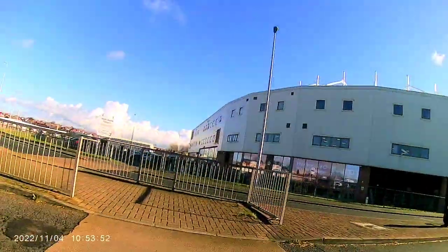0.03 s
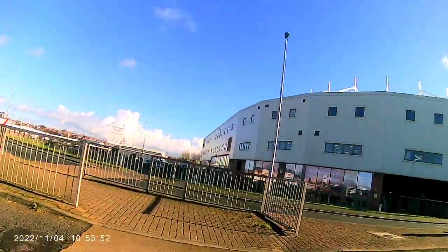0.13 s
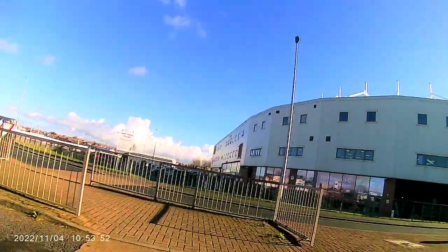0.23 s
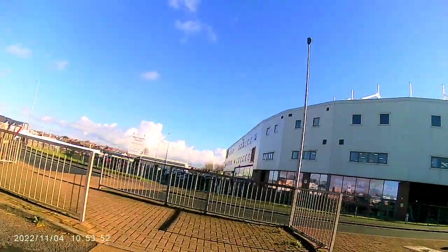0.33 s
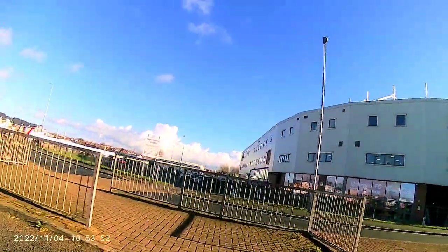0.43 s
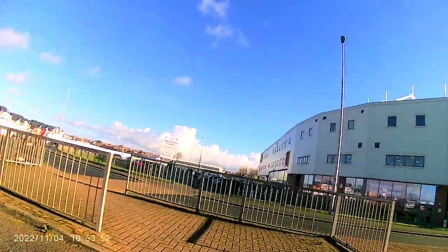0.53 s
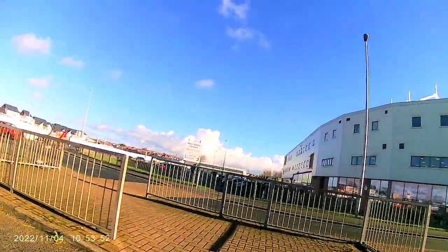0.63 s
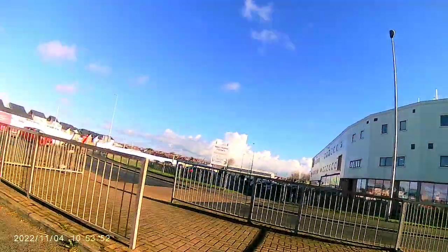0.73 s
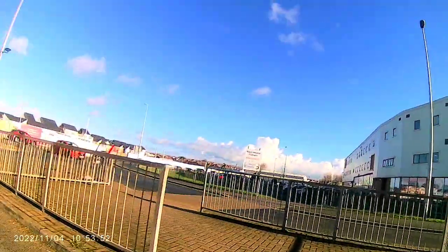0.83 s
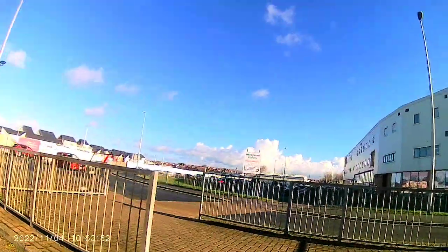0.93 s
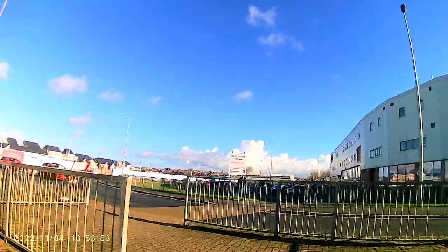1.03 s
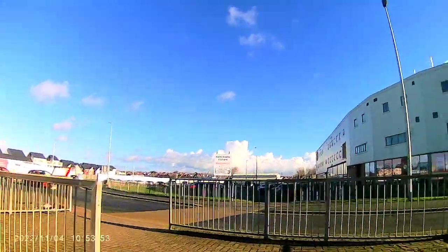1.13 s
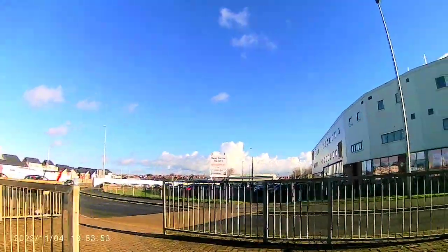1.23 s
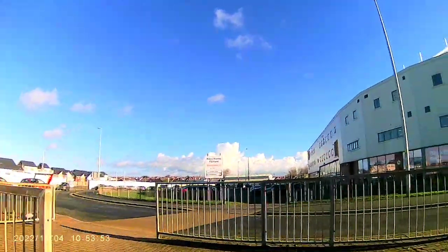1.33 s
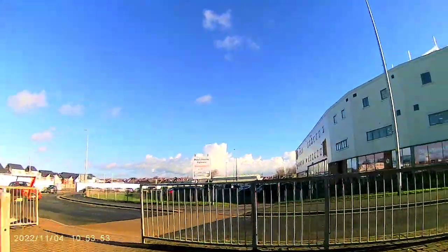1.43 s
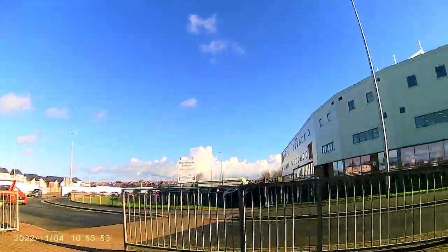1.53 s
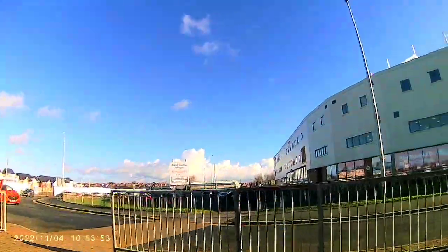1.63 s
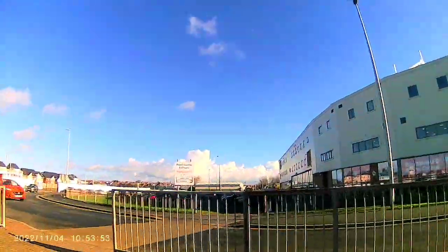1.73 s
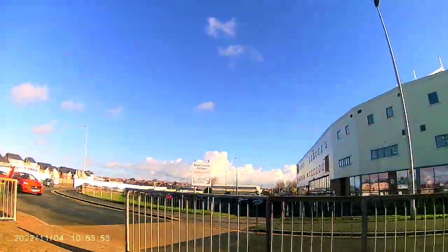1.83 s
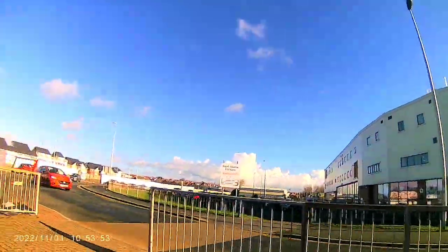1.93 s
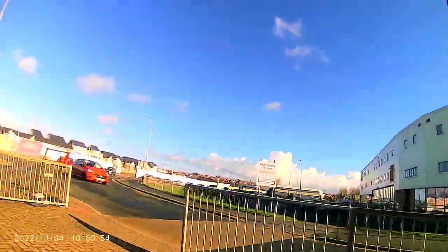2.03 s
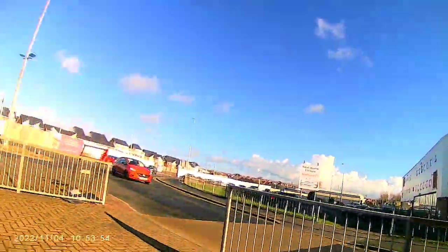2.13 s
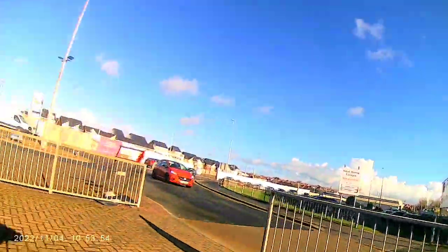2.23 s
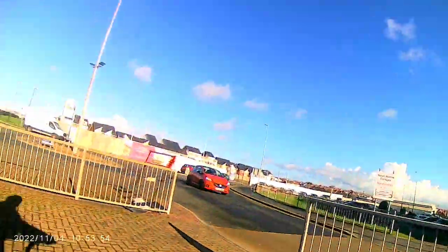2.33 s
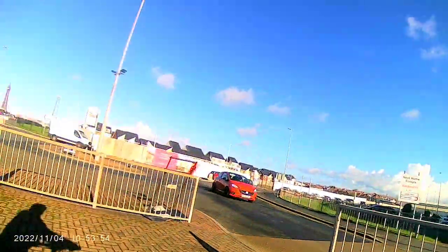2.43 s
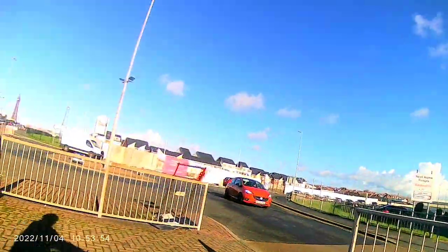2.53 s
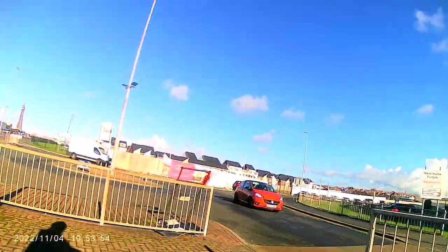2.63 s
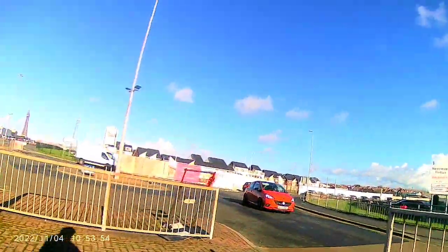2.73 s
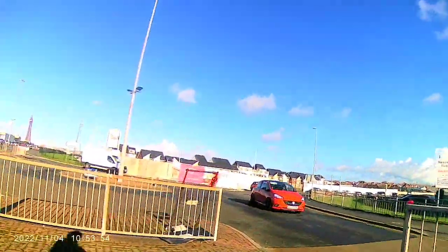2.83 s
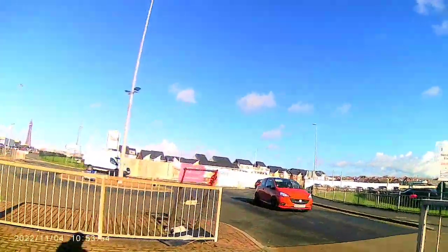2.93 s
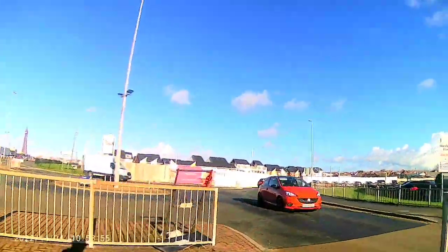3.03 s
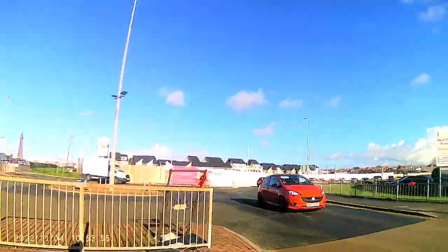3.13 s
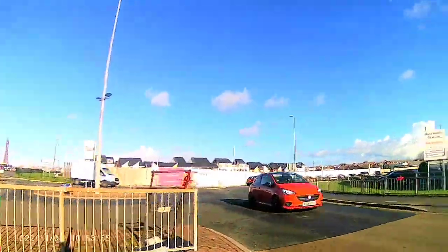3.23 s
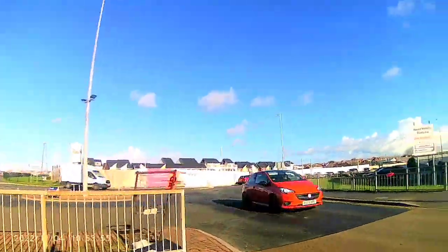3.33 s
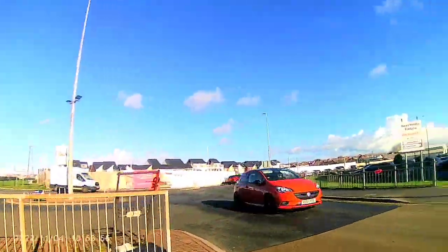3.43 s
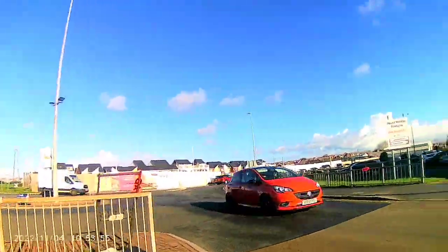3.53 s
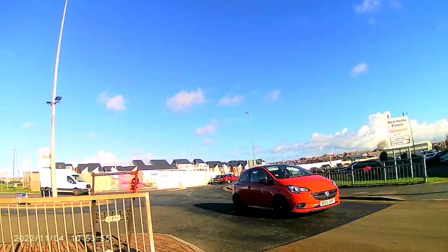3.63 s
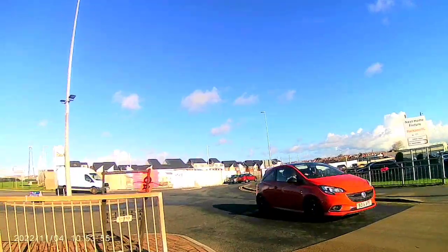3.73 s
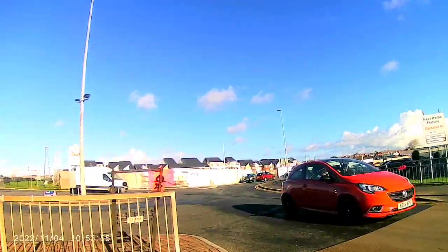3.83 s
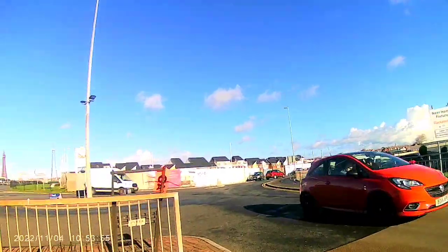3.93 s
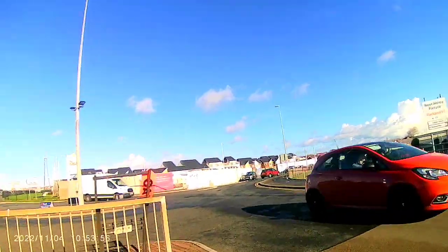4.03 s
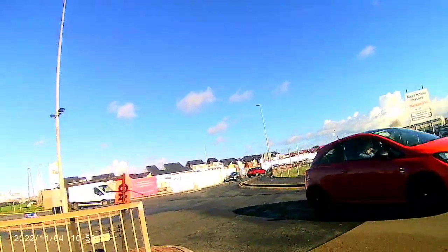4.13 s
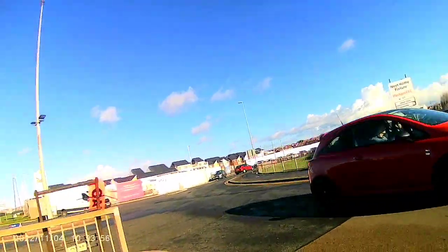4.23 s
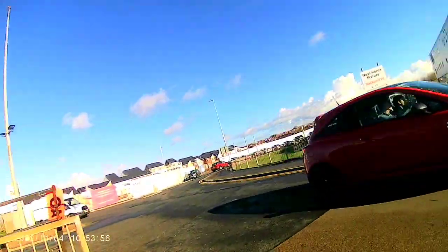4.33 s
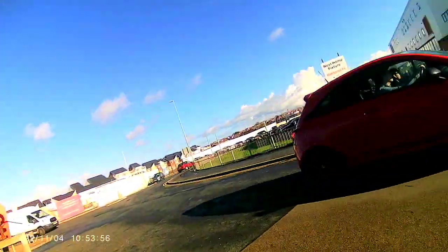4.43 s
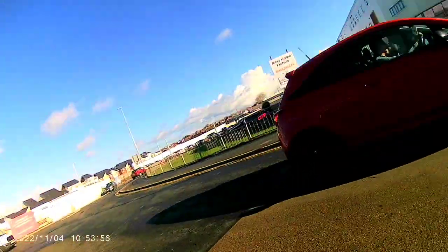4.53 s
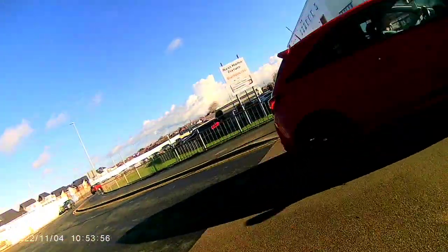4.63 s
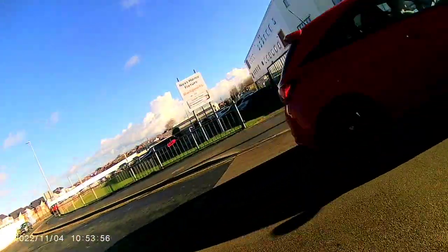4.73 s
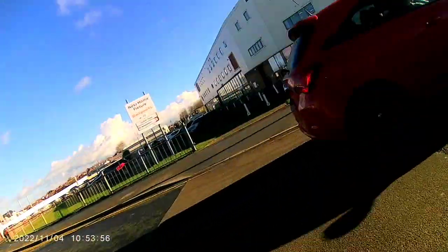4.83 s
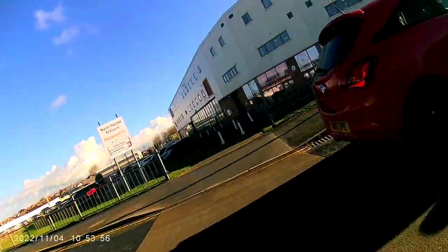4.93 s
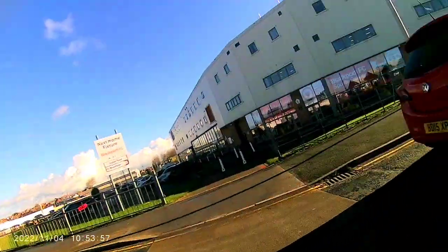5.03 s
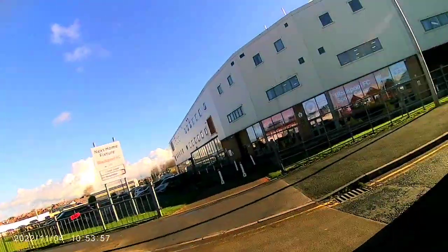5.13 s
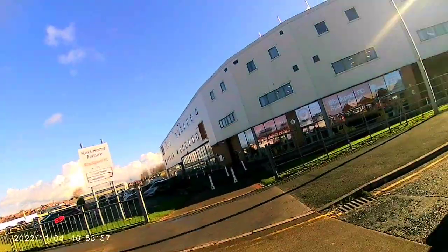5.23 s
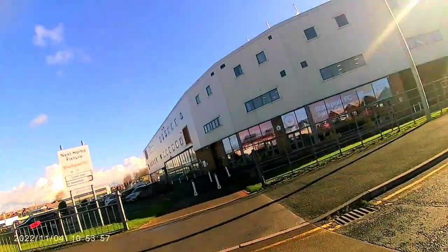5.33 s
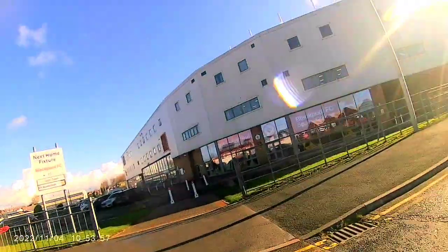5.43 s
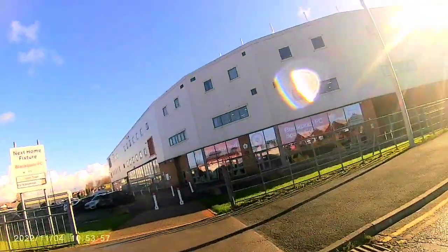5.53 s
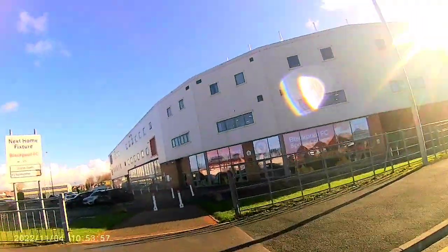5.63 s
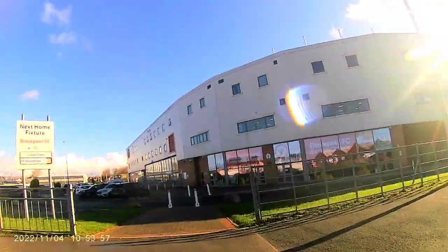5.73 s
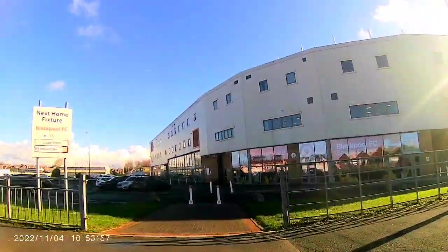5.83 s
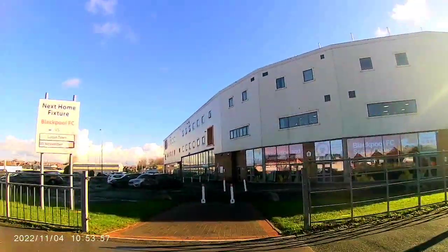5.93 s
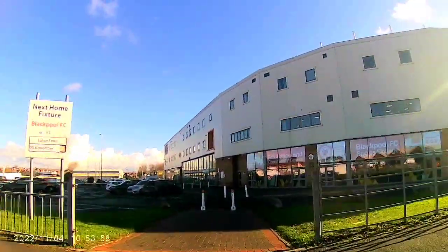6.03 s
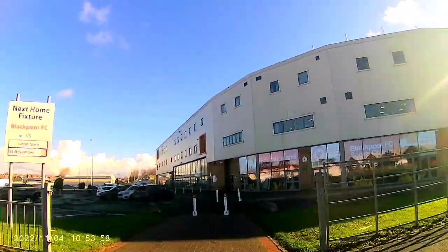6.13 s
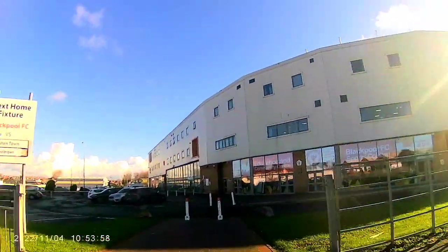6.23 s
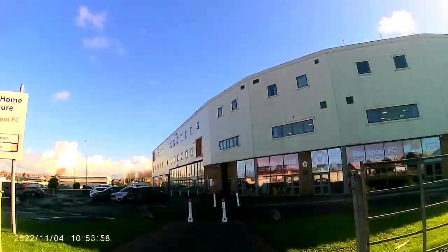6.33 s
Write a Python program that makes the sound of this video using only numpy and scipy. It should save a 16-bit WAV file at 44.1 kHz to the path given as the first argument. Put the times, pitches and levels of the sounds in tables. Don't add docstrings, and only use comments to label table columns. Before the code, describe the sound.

The microphone is clamped to the handlebar of a small electric scooter on an open street. From 0 to 0.8 s a low mid motor tone wavers, surges near 0.6 and fades, with frame hum, light tyre buzz and quick dry ticks. Wind swells around 0.8. A faint whine glides down into a low hum, ending near 1.45 with small knocks. From 1.5 to 3.5 s it rolls slowly: soft rumbling wind, sparse ticks, minor joint taps. A heavy gust hits about 3.55. At 3.85 the motor bites and climbs, with sharp wind thumps from 4.1 to 4.6. Cracks and slaps cluster at 4.7 to 5.1. From 5.2 a low drone starts, dips and rises; frame hum swells, ticking thickens, and hard clattering impacts peak near 6.15 and 6.25, distorting until the cut at about 6.4.

```python
import sys
import numpy as np
from scipy import signal
from scipy.fft import rfft, irfft, next_fast_len
from scipy.io import wavfile

SR = 44100
rng = np.random.default_rng(int(sys.argv[2]) if len(sys.argv) > 2 else 0)


def waveform_to_disk(signal):
    frames = np.transpose(np.atleast_2d(signal))
    scaled = np.clip(frames, -1, 1) * 32767
    samples = np.round(scaled).astype(np.int16)
    wavfile.write(sys.argv[1], SR, samples)


def field_ratio(decibels):
    return 10 ** (np.asarray(decibels, dtype=float) / 20)


N = 281341

# start_s, pitch_hz, level_db
DRONE = [
    (5.22, 156.1, -34.5),
    (5.296, 157.4, -11),
    (5.42, 160.9, -10),
    (5.46, 164.9, -14),
    (5.518, 168, -10),
    (5.554, 178.7, -33.5),
    (5.59, 172.7, -12.5),
    (5.65, 177, -34.5),
]
# centre_hz, width_hz, level_db
HOUSING = [(3120, 100, -8), (3420, 240, 0), (3850, 220, 0), (4700, 250, -17), (5060, 200, -15),
           (5950, 500, -21), (6680, 170, -6), (7050, 350, -11)]
# centre_hz, width_hz, level_db
STEM = [(690, 80, -3), (754, 62, -1.5), (960, 610, -11.5), (1190, 100, 6.5), (1380, 210, 8.5),
        (1584, 78, 12), (1630, 30, -8), (1660, 81, 0.5), (2080, 68, -7.5), (2440, 130, -8.5),
        (2960, 310, -7)]
# centre_hz, width_hz, level_db
FORK = [(414.6, 35.6, -3.5), (314.7, 60, 5), (595, 14, -23.5)]


def rms_one(x):
    return x / np.sqrt(np.mean(x ** 2) + 1e-20)


def in_time(rows):
    s, *columns = np.transpose(rows)
    return [np.interp(np.arange(N) / SR, s, c) for c in columns]


def drift(rate_hz):
    r = np.exp(-40 * np.pi * rate_hz / SR)
    noise = rng.standard_normal(N // 20 + 2002)
    slow = signal.lfilter([1], [1, -2 * r, r * r], noise)[2000:]
    return np.interp(np.arange(N) / 20, np.arange(len(slow)), rms_one(slow))


def resonate(x, modes):
    out = 0
    for hz, width_hz, db in modes:
        r = np.exp(-np.pi * width_hz / SR)
        zeros = np.array([1, 0, -1]) * (1 - r * r) / 2
        poles = [1, -2 * r * np.cos(2 * np.pi * hz / SR), r * r]
        out = out + field_ratio(db) * signal.lfilter(zeros, poles, x + 1e-18)
    return out


def band(x, low_hz, high_hz, order):
    return signal.sosfilt(signal.butter(order, [low_hz, high_hz], "band", fs=SR, output="sos"), x)


def coloured(spectrum):
    size = next_fast_len(N)
    hz, db = np.transpose(spectrum)
    log_hz = np.log(np.arange(size // 2 + 1) * SR / size + 1)
    gain = field_ratio(np.interp(log_hz, np.log(hz), db, left=-90, right=-120))
    return rms_one(irfft(rfft(rng.standard_normal(size)) * gain, size)[:N])


def tone(rows, wobble_db, wobble_share):
    start_s, end_s = rows[0][0], rows[-1][0]
    fade_s = .02
    span = slice(max(int((start_s - fade_s) * SR), 0), int((end_s + fade_s) * SR))
    hz, db = in_time(rows)
    t = np.arange(N)[span] / SR
    fade_in = np.clip((t - start_s + fade_s) / fade_s, 0, 1)
    fade_out = np.clip((end_s + fade_s - t) / fade_s, 0, 1)
    phase = 2 * np.pi * np.cumsum(hz * (1 + wobble_share * drift(25))) / SR
    level = field_ratio((db + wobble_db * drift(11))[span])
    out = np.zeros(N)
    out[span] = np.sqrt(2) * fade_in * fade_out * level * np.sin(phase[span])
    return out


def partial(rows, ratio, gain_db):
    return [(s, ratio * hz, db + gain_db) for s, hz, db in rows]


def bursts(times_s, heights, lengths_s):
    shape = np.zeros(N)
    for s, height, length_s in zip(times_s, heights, lengths_s):
        at = round(s * SR)
        t = np.arange(min(N - at, 4000)) / SR / max(length_s, 1e-4)
        shape[at:at + len(t)] += height * t ** 0.15 * np.exp(-t * t)
    return shape * rng.standard_normal(N)


def clicks(times_s, heights):
    out = np.zeros(N)
    at = np.round(np.array(times_s) * SR).astype(int)
    np.add.at(out, np.minimum(at, N - 1), heights)
    return out


def swells(rows):
    out, t = np.zeros(N), np.arange(N) / SR
    for s, db, width_s in rows:
        near = slice(max(int((s - 3 * width_s) * SR), 0), int((s + 3 * width_s) * SR))
        out[near] += field_ratio(db) * np.exp(-((t[near] - s) / width_s) ** 2)
    return out


def motor():
    # start_s, pitch_hz, level_db
    cruise = [
        (0.0, 352.7, -18),
        (0.019, 366.2, -20),
        (0.19, 368.8, -20.5),
        (0.49, 345.6, -21),
        (0.532, 348.2, -40),
        (0.569, 356.3, -10.5),
        (0.607, 372.6, -27.5),
        (0.716, 341, -17.5),
        (0.8, 329, -36),
    ]
    braking = [
        (0.0, 1162, -45.5),
        (0.114, 1223, -47.5),
        (0.675, 1143, -50.5),
        (0.79, 1000, -64),
        (1.054, 620, -62),
        (1.15, 470, -43),
        (1.25, 363.6, -33),
        (1.4, 187.1, -25),
        (1.451, 173, -41),
    ]
    pull_away = [
        (3.85, 226, -23),
        (3.932, 252.2, -15),
        (4.201, 250.6, -16.5),
        (4.297, 290.8, -17.5),
        (4.434, 361.2, -25),
        (4.531, 404, -22.5),
        (4.701, 485.7, -39),
        (5.042, 531, -33),
        (5.448, 560.5, -46),
    ]
    full_drone = [
        (5.62, 191, -22),
        (5.628, 194.5, -13),
        (5.698, 174.2, -19),
        (5.83, 200.4, -16),
        (5.9, 186.9, -13),
        (6.05, 197.9, -15.5),
        (6.084, 184.3, -9),
        (6.312, 195.9, -12),
        (6.38, 216, -15),
    ]
    tread = [
        (5.3, 410, -43),
        (5.366, 394.1, -38),
        (6.15, 425, -30),
        (6.38, 435, -36),
    ]
    surge = [
        (4.3, 152.9, -26.5),
        (4.45, 138.6, -18.5),
        (4.62, 155.1, -24.5),
        (4.8, 170.7, -14.5),
        (4.95, 182, -32),
    ]
    whine = [
        (5.4, 1080, -62),
        (5.52, 1115, -55),
        (5.76, 1152, -55),
        (5.88, 1215, -55),
        (6.0, 1255, -57),
    ]
    hum = [
        (4.3, 1233, -56),
        (4.79, 1210, -49),
        (4.85, 1190, -58),
    ]

    low = tone(cruise, 0.93, .0022) + tone(pull_away, 2.4, .022) + tone(DRONE, 2.3, .019)
    low = low + tone(full_drone, 1.5, .014) + tone(tread, 4.4, .0347) + tone(surge, 4.0, .06)
    high = tone(braking, 4.5, .016) + tone(whine, 3.0, .009) + field_ratio(-3) * tone(hum, 4.0, .025)
    high = high + tone(partial(whine, 5 / 6, 1.0), 3.0, .009)
    high = high + tone(partial(pull_away[:3], 3, -34.0), 5.0, .04)
    high = high + tone(partial(full_drone, 3, -31.0), 5.0, .035)
    high = high + tone(partial(cruise, 2, -33.0), 5.0, .02)
    high = high + tone(partial(cruise, 3, -38.0), 5.7, .013)
    high = high + tone(partial(cruise, 5, -41.0), 4.0, .012)
    sixth = [(s, hz / 6, -29.0) for s, hz, db in braking if s < .7]
    return low + high + tone(sixth, 0.83, .023)


def frame(hum_db):
    # centre_hz, width_hz, level_db
    frame_modes = [(190.8, 22, 6.5), (162.3, 17, -2.5), (211, 11, -4.5)]
    shaken = rms_one(band(resonate(rng.standard_normal(N), frame_modes), 130, 235, order=3))
    droning = np.clip((np.arange(N) / SR - DRONE[0][0]) / .05, 0, 1)
    return field_ratio(hum_db - 0.5 - 3.8 * droning) * shaken


def wind(gust_db):
    # freq_hz, density_db
    lump_spectrum = [(5.9, -26), (10, 2.5), (32, -2.5), (90, -18.5), (120, -36), (200, -120)]
    flutter_spectrum = [(40, -5.5), (70, -3.5), (120, 0), (160, -6), (250, -32.5), (400, -39)]
    # centre_s, peak_db, half_width_s
    buffets = [(0.0, -30, 0.36), (0.689, -9, 0.011), (1.301, -35, 0.16), (2.17, -17, 0.042),
               (3.567, -10.5, 0.014), (3.861, -30.5, 0.28), (4.281, -26.5, 0.11), (4.438, -8.5, 0.04),
               (4.573, -16.5, 0.044), (5.188, -12.5, 0.015), (5.45, -30, 0.023), (6.042, -9.5, 0.029),
               (6.25, -22.5, 0.18)]
    # centre_s, peak_db, half_width_s
    pushes = [(2.949, -1, 0.0054), (3.595, -4, 0.0024), (4.121, 0, 0.0043), (4.154, -2, 0.0025),
              (4.212, 2.5, 0.004), (4.245, -2.5, 0.0019), (4.279, 1.5, 0.005), (5.186, -1, 0.0022),
              (5.303, -5, 0.0023), (4.257, 0, 0.0024), (4.368, -9, 0.0017), (4.416, -6.5, 0.0018),
              (4.44, -6.5, 0.0027), (4.568, -7, 0.0023), (4.628, -7, 0.0022), (6.034, -5.5, .003),
              (5.466, -12, 0.002)]
    flutter_db, flutter_follows = -32.5, 0.35
    port_top = .46

    lumps = rms_one(coloured(lump_spectrum) * field_ratio(1.5 * drift(6)))
    flutter = rms_one(coloured(flutter_spectrum) * field_ratio(1.5 * drift(14)))
    steady = field_ratio(flutter_db + flutter_follows * (gust_db - gust_db.mean()))
    eddies = field_ratio(gust_db) * lumps + (steady + swells(buffets)) * flutter
    return port_top * np.tanh(eddies / port_top) + band(swells(pushes), 15, 650, order=2)


def road():
    # start_s, level_db
    rolling = [(0.0, -50), (0.51, -50.5), (0.8, -54), (0.94, -55), (1.62, -58.5), (2.54, -58),
               (3.09, -60.5), (3.66, -61), (4.21, -54), (4.44, -51.5), (4.6, -50), (4.92, -49.5),
               (5.21, -48), (5.63, -50.5), (6.24, -42.5), (6.38, -45.5)]
    # freq_hz, density_db
    hiss_spectrum = [(2400, -26), (3100, 6.5), (3500, -5), (3900, -2.5), (5500, 3), (6720, 2.5),
                     (8500, -10), (11000, -30.5)]
    fork_db, fork_follows, low_stem_db, low_stem_follows = -38, 1.31, -55, 1.26
    strain_s, strain_width_s, strain_peak_db = 4.03, 0.49, 7
    air_db = -16

    high_db, = in_time(rolling)
    swing_db = high_db - high_db.mean()
    strain_db = strain_peak_db * np.exp(-((np.arange(N) / SR - strain_s) / strain_width_s) ** 2)
    rumble_db = fork_db + fork_follows * swing_db + strain_db
    low_db = low_stem_db + low_stem_follows * swing_db + strain_db
    rumble = rms_one(band(resonate(rng.standard_normal(N), FORK), 240, 505, order=4))
    roughness = rng.standard_normal(N) * field_ratio(1.5 * drift(30))
    low = rms_one(band(resonate(roughness, STEM[:3]), 590, 973, order=3))
    high = rms_one(band(resonate(roughness, STEM[3:]), 910, 3100, order=4))
    air_modes = HOUSING + [(5700, 1500, -17), (7700, 1000, -14)]
    puffs_db = 2.0 * drift(40)
    air = field_ratio(high_db + air_db + puffs_db) * rms_one(resonate(coloured(hiss_spectrum), air_modes))
    return field_ratio(rumble_db + 3.0 * drift(30)) * rumble + field_ratio(low_db) * low + field_ratio(high_db) * high + air


def rattle(shake):
    # start_s, length_s, tick_db, share of swings that land
    spells = [(0.005, .05, -53, .8), (.056, .035, -52, .8), (.106, .025, -50, .7), (.137, .058, -50, .9),
              (0.2, .04, -50, .7), (.255, .043, -50, 1), (0.433, .092, -50, 1), (0.555, .065, -49, 1),
              (.638, .006, -50, 1), (.657, .006, -48, 1), (0.701, .021, -49, 1), (0.82, .052, -51, 1),
              (0.894, .047, -51, .7), (1.154, .032, -50, 1), (1.214, .08, -49, .5), (1.376, .021, -49, 1),
              (1.583, .037, -52, 1), (1.631, .012, -54, 1), (1.664, .007, -53, 1), (1.718, .018, -56, 1),
              (1.752, .018, -53, 1), (2.147, .005, -52, 1), (2.178, .025, -53, 1), (3.875, .03, -49, 1),
              (3.957, .03, -46, 1), (4.094, .029, -47, 1), (4.142, .047, -47, 1), (4.307, .088, -48, .9),
              (4.43, .012, -49, 1), (4.474, .135, -56, .6), (4.761, .01, -44, 1), (4.848, .016, -43, 1),
              (4.945, .043, -53, .8), (5.0, .038, -52, .7), (5.067, .015, -47, 1), (5.216, .183, -51, 1),
              (5.44, .035, -52, .8), (5.487, .03, -46, 1), (5.575, .016, -46, 1), (5.603, .007, -49, 1),
              (5.63, .012, -49, 1), (5.667, .01, -50, 1), (5.7, .026, -49, 1), (5.745, .045, -47, 1),
              (5.824, .08, -48, 1), (5.918, .041, -47, 1), (5.997, .022, -43, 1), (6.03, .075, -44, .9),
              (6.138, .135, -42, 1), (6.295, .05, -42, 1)]
    # start_s, tick_db
    lone_ticks = [(0.755, -53), (.96, -50), (.982, -50), (0.778, -48), (0.343, -47), (.385, -50),
                  (.391, -50), (4.231, -47), (4.243, -53), (4.264, -53), (4.63, -51), (4.643, -51),
                  (4.672, -44), (3.86, -50), (4.201, -48), (4.748, -50), (5.137, -50), (5.4014, -49),
                  (5.4079, -47), (5.4128, -46), (5.4188, -44), (5.339, -48), (5.351, -48), (.413, -52),
                  (.8, -56), (6.122, -50), (1.507, -48), (1.892, -48), (1.939, -46), (2.091, -48),
                  (2.251, -51), (2.301, -48), (2.359, -51), (2.42, -53), (2.494, -50), (2.713, -48),
                  (2.828, -48), (2.888, -50), (3.094, -46), (3.238, -51), (3.378, -50), (3.418, -51),
                  (3.468, -45), (3.57, -48), (3.841, -45), (3.932, -46), (4.022, -47), (4.054, -46),
                  (4.078, -48), (5.119, -50), (5.975, -42), (6.366, -42)]
    # start_s, peak_db
    slap_events = [(1.415, -40.5), (1.438, -35), (4.6872, -24.5), (4.7212, -25), (4.783, -31),
                   (4.7952, -21.5), (4.8062, -20.5), (4.8477, -34.5), (4.86, -50), (5.0766, -32),
                   (5.627, -27), (5.767, -31.5), (5.7736, -29.5), (5.873, -32), (5.924, -29), (5.9746, -27),
                   (5.9967, -17.5), (6.0083, -32), (6.065, -18.5), (6.145, -30), (6.1546, -11),
                   (6.03, -34.5), (6.099, -28.5), (6.171, -34), (6.234, -35), (5.855, -34), (6.19, -32),
                   (6.2047, -36), (6.245, -14.5), (6.306, -22), (6.329, -25.5), (6.365, -24.5)]
    # low_hz, high_hz, level_db
    openings = [(2900, 4120, 0), (4500, 5250, 0.2), (5450, 6300, -6), (6440, 7500, 0.0)]
    landing_spread_s = .0006
    rebound_s, rebound_db = .003, -11
    tick_db, scuff_db, scuff_s = -3, -3.5, .0006
    slap_db, slap_stem_db = 3, 4.5

    swing = band(shake, 150, 225, order=3)
    landings_s = np.flatnonzero((swing[:-1] > 0) & (swing[1:] <= 0)) / SR
    chance = rng.standard_normal(N)
    ticks = np.zeros(N)
    for s, length_s, db, share in spells + [(s, 0, db, 1) for s, db in lone_ticks]:
        inside_s = landings_s[(landings_s > s + .003) & (landings_s < s + length_s)]
        at = np.round(np.append(s, inside_s) * SR).astype(int)
        speed = swing[at] - swing[at + 1]
        kept = np.append(at[0], at[speed >= np.quantile(speed, 1 - share)])
        late = (landing_spread_s * SR * abs(chance[kept + 1])).astype(int)
        ticks[kept + late] = field_ratio(db + 32.5)
    rebounds = np.roll(ticks, round(rebound_s * SR)) * field_ratio(rebound_db + 1.2 * chance)
    contacts = (ticks * field_ratio(1.8 * chance) + rebounds) * field_ratio(tick_db + 1.0 * drift(15))

    fade = np.exp(-1 / (scuff_s * SR))
    scuff_level = np.sqrt(signal.lfilter([1 - fade], [1, -fade], contacts ** 2))
    rung = 0
    for mode in HOUSING:
        scuff = scuff_level * rng.standard_normal(N)
        rung = rung + resonate(contacts + field_ratio(scuff_db) * scuff, [mode])
    ticking = sum(field_ratio(db) * band(rung, low_hz, high_hz, order=3) for low_hz, high_hz, db in openings)

    s, db = np.transpose(slap_events)
    slaps = bursts(s, field_ratio(db + slap_db), np.full(len(s), .0018))
    slap_modes = HOUSING + [(5870, 1100, -2), (3670, 240, -1.5), (7700, 600, -14.5)]
    return ticking + resonate(slaps, slap_modes) + field_ratio(slap_stem_db) * resonate(slaps, STEM[5:])


def joints():
    # start_s, crack_db, dullness_db, length_s
    paving = [(0.474, -37.5, -8, 0.0054), (0.699, -48, 1.5, 0.0069), (1.441, -42, -2, 0.0036),
              (1.743, -40.5, -7, 0.0071), (2.708, -52, -6, 0.0032), (2.781, -41, -16, 0.0055),
              (2.838, -49, 4, 0.022), (3.094, -53, 7, 0.003), (3.307, -51, -3, 0.0035),
              (3.826, -42.5, 6.5, 0.0044), (4.505, -41.5, -2, 0.022), (4.773, -26.5, -8.5, .012),
              (4.85, -34, -0.5, .008), (4.924, -41.5, 10, 0.0071), (4.948, -37, 5.5, .006),
              (5.028, -36, -12.5, 0.011), (5.062, -35, 8, 0.0057), (5.442, -43, 6, 0.009),
              (6.035, -31.5, -1, 0.0054), (6.364, -38, -15, 0.0025), (0.563, -38, 2.5, 0.013),
              (0.809, -42.5, 7, 0.0049), (0.978, -35, 3.5, 0.0067), (1.411, -41.5, 0.5, 0.015),
              (4.279, -45, 2, 0.0032), (1.945, -34.5, -7, 0.0044), (2.885, -46, 3, 0.0047),
              (2.925, -50, 15.5, 0.0052), (2.953, -41, -3.5, 0.0057), (3.227, -35.5, -1.5, 0.0065),
              (3.38, -38.5, -2, 0.011), (3.596, -41.5, 0.5, 0.0078), (3.846, -38.5, -1.5, 0.0071),
              (3.9882, -27.5, 7, 0.016), (4.148, -37, 2.5, 0.005), (4.199, -27, -1, 0.0075),
              (4.684, -28, -4, 0.005), (4.787, -25, -2, 0.0061), (5.113, -24, 3, 0.011),
              (5.193, -34, 2.5, 0.0076), (5.623, -39.5, 10.5, 0.0072), (5.763, -36, 1.5, 0.0088),
              (6.013, -24, -16, 0.0049), (6.048, -24.5, -5, 0.011), (6.1545, -8, -4, 0.0082),
              (6.23, -18.5, 3, 0.0064), (6.247, -25, 1.5, 0.015), (6.298, -27.5, -14, 0.0047),
              (6.309, -27, 8, 0.008)]
    # start_s, level_db
    thumps = [(0.412, -23), (0.425, -26), (0.47, -30.5), (2.017, -33), (2.843, -38), (3.175, -36),
              (3.327, -33), (4.924, -22.5), (5.033, -18.5), (5.77, -22.5), (6.095, -18)]
    # start_s, peak_db, pitch_hz
    rap_events = [
        (3.596, -38, 482),
        (4.15, -26, 509),
        (4.278, -31, 646),
        (5.341, -27, 544),
        (5.416, -28, 536),
        (5.462, -25, 550),
        (5.507, -28, 530),
        (5.934, -26, 570),
    ]
    rap_width_hz = 70
    thud_over_crack_db, thud_follows = 11, 0.93
    bright_follows = 1.2
    low_crack_follows, top_crack_follows = 0.57, -0.39

    s, crack_db, dull_db, length_s = np.transpose(paving)
    low_crack_db = crack_db + low_crack_follows * dull_db + 11.0
    top_crack_db = bright_follows * crack_db + top_crack_follows * dull_db + 12.5
    knock_db = crack_db + dull_db + 19.0
    thud_db = crack_db + thud_over_crack_db + thud_follows * dull_db + 51.0

    top_modes = [(2020, 290, -6), (2460, 250, -5.5), (3320, 1200, -19.5)]
    knock_modes = [(665, 59, 3.5), (780, 61, 0.0), (884, 55, -3.0)]
    crack = resonate(bursts(s, field_ratio(crack_db + 9.0), length_s), [(1611, 160, 7.0), (950, 110, -16.0)])
    crack = crack + resonate(bursts(s, field_ratio(low_crack_db), length_s), [(1190, 170, 3.3)])
    crack = crack + resonate(bursts(s, field_ratio(top_crack_db), length_s), top_modes)
    knock = resonate(bursts(s, field_ratio(knock_db), length_s), knock_modes)

    lone_s, lone_db = np.transpose(thumps)
    hits = clicks(s + .002, field_ratio(thud_db)) + clicks(lone_s, field_ratio(lone_db + 54.5))
    thud = resonate(hits, FORK[:1] + [(480.0, 50, -16.0)])
    raps = np.zeros(N)
    for at_s, db, hz in rap_events:
        hit = clicks([at_s], field_ratio(db) * SR / (np.pi * rap_width_hz))
        raps += resonate(hit, [(hz, rap_width_hz, -2.5)])
    stem = band(raps, 400, 850, order=2) + band(crack, 740, 3100, order=2) + band(knock, 350, 760, order=2)
    return stem + band(thud, 320, 520, order=2)


def scene():
    # start_s, level_db
    shaking = [(0.0, -32), (0.78, -17.5), (1.03, -29), (1.21, -15.5), (1.33, -25.5), (1.39, -16.5),
               (1.53, -29), (1.6, -23.5), (3.5, -31.5), (3.57, -25.5), (3.66, -37), (3.84, -21.5),
               (4.83, -17), (4.9, -19), (5.51, -18), (5.54, -16), (6.08, -7), (6.38, -6)]
    # start_s, level_db
    gusts = [(0.0, -36.5), (0.62, -30.5), (0.78, -10), (1.1, -37), (1.37, -19.5), (1.53, -39),
             (1.69, -18.5), (2.31, -27), (2.65, -18.5), (3.44, -15), (3.48, -37), (3.55, -7), (4.26, -15.5),
             (4.74, -22.5), (5.15, -20.5), (5.97, -26.5), (6.04, -28), (6.38, -40)]
    # centre_s, loss_db, half_width_s
    lulls = [
        (6.124, 8, 0.029),
        (6.282, 5.5, .012),
        (6.355, 9, .01),
        (5.53, 3.5, 0.0086),
    ]
    hum_db, = in_time(shaking)
    gust_db, = in_time(gusts)
    t = np.arange(N) / SR
    lull_db = sum(loss_db * np.exp(-((t - s) / width_s) ** 2) for s, loss_db, width_s in lulls)
    shake = (frame(hum_db) + motor()) * field_ratio(-lull_db)
    return (shake + wind(gust_db) + road() + joints() + rattle(shake))[None]


def band_limit(x):
    return signal.sosfilt(signal.butter(12, 16000, fs=SR, output="sos"), x)


def record(dry):
    overload, offset = .712, .006
    clipped = np.clip(.93 * dry + offset, -overload, overload) * 1.085
    cut = signal.sosfilt(signal.cheby1(6, 1, 7400, fs=SR, output="sos"), clipped)
    return band_limit(np.clip(cut, -overload, overload))


dry = scene()
out = record(dry)
waveform_to_disk(out)
```